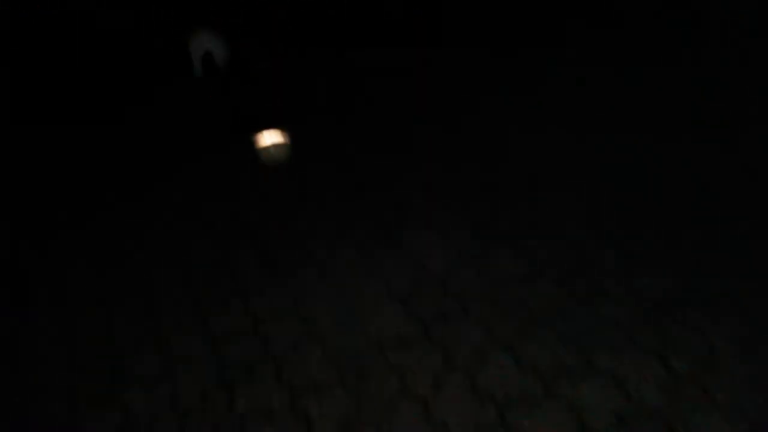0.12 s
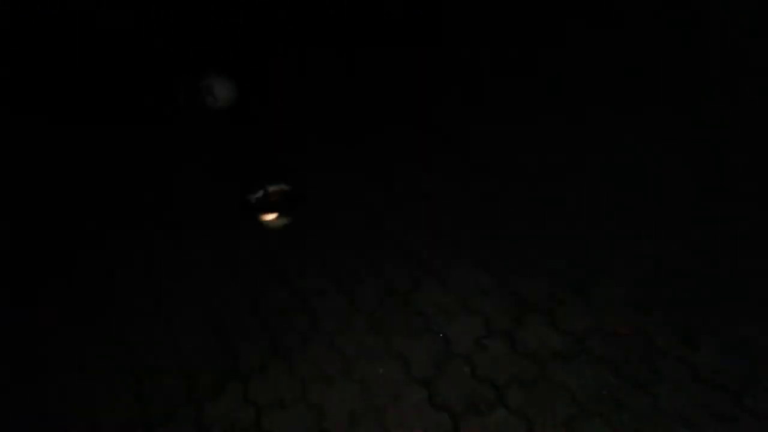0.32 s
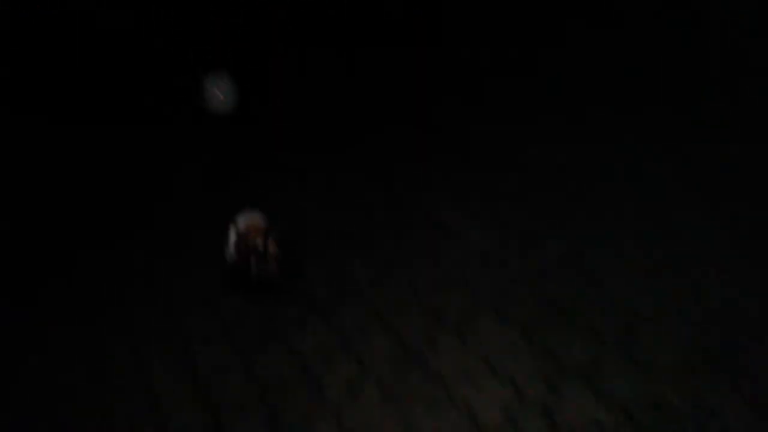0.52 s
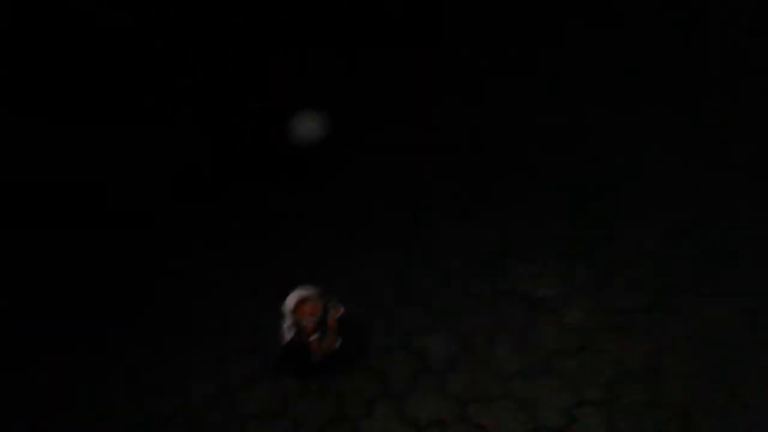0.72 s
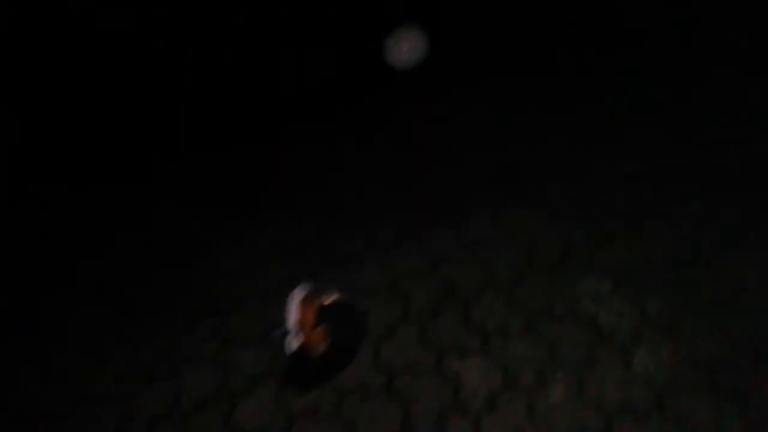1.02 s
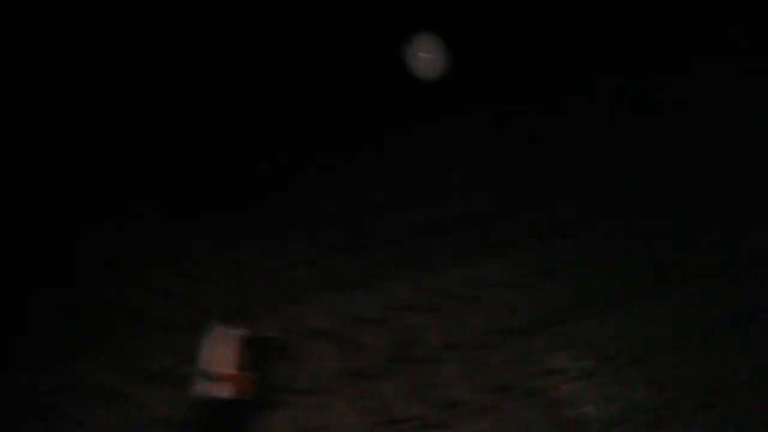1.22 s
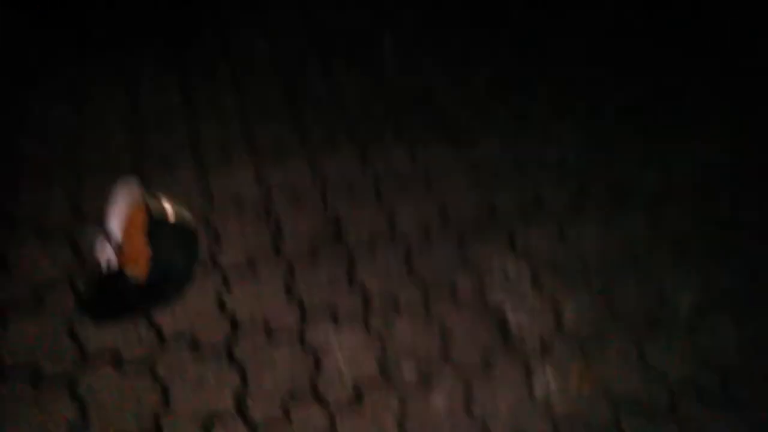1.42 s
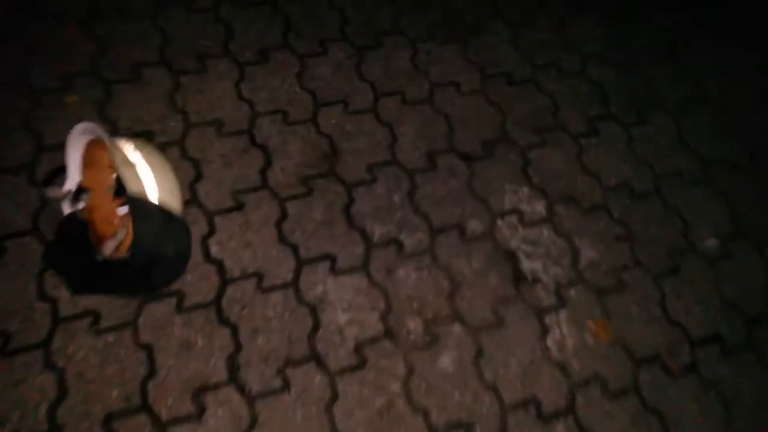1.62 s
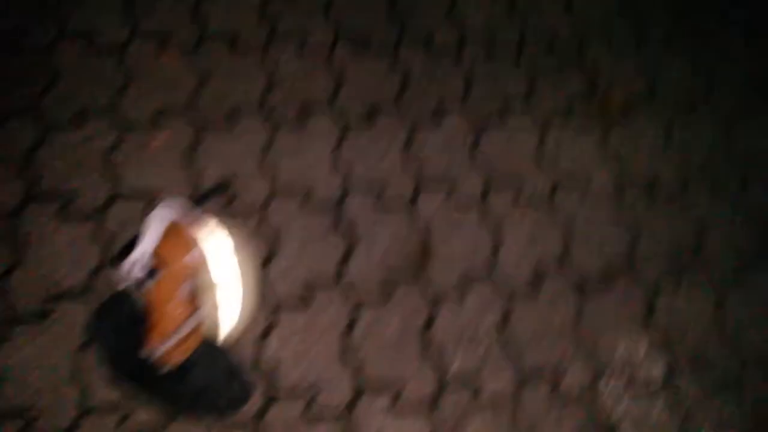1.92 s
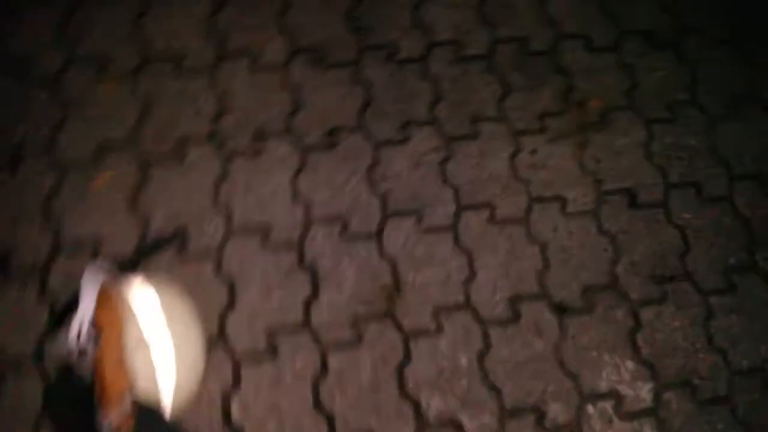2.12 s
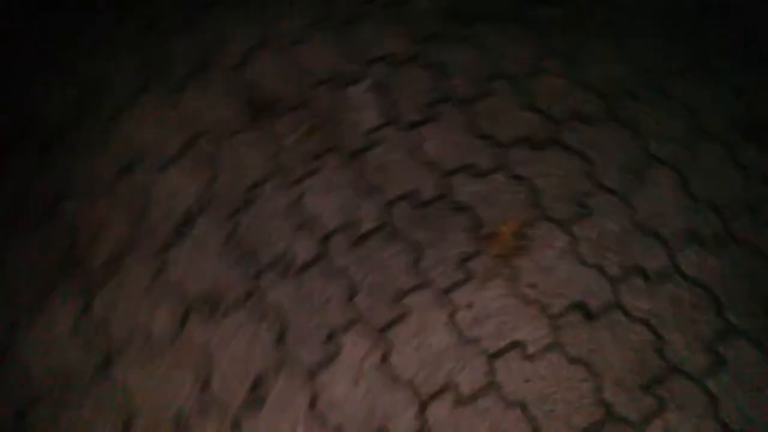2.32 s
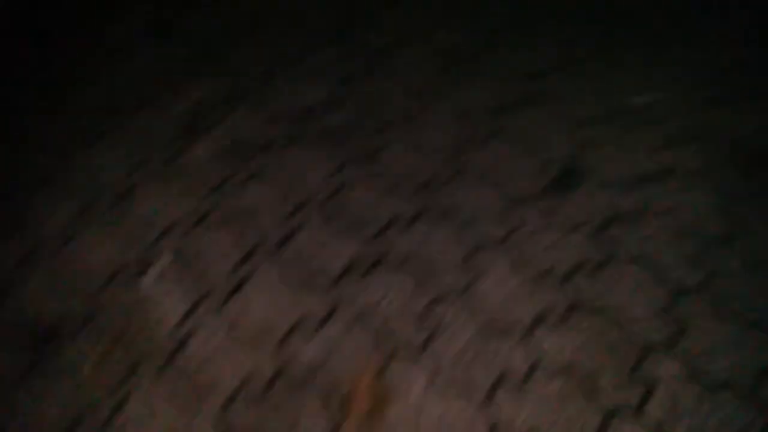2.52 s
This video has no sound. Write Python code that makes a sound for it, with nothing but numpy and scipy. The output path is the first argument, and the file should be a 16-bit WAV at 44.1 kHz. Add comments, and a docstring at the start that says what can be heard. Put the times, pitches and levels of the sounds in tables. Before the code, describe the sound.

Hard-shelled helmet cracks and skitters over outdoor paving, followed by gritty steps and dry knocks

```python
"""Over a thin night rustle a hard helmet clatters away across stone paving, a wall answering each blow.
The walker follows with thuds, knocks, scuffs and ticks of grit and gear. Blows and ticks are noise cracks with a
hollow tock, the helmet adds ringing shell modes; thuds and knocks are short sine hollows with noise; scuffs, rustle,
handling and wind are shaped noise. The two microphone ports differ, and the right one peaks in the treble."""
import sys
import numpy as np
from scipy import signal
from scipy.fft import rfft, irfft, next_fast_len
from scipy.io import wavfile
from scipy.ndimage import uniform_filter1d, map_coordinates

SR = 44100
rng = np.random.default_rng(int(sys.argv[2]) if len(sys.argv) > 2 else 0)


def attenuation_scalar(level_db):
    """Turn a level in dB into a linear amplitude multiplier (20 dB per decade)."""
    decades = np.asarray(level_db, float) / 20
    return 10 ** decades


def store_wav(level_fs):
    """Save 16-bit WAV to argv[1]."""
    pcm = np.round(np.clip(np.atleast_2d(level_fs), -1, 1) * 32767)
    wavfile.write(sys.argv[1], SR, pcm.T.astype(np.int16))


N = 116865


def unit(x):
    """Scales to rms 1."""
    return x / np.sqrt(np.mean(x ** 2) + 1e-20)


def along(points, hz):
    """Reads (Hz, value) points on a log frequency axis."""
    point_hz, value = np.transpose(points)
    return np.interp(np.log(hz + 1), np.log(point_hz + 1), value)


def wobble(knots_per_s):
    """A smooth random curve through up to 400 knots a second."""
    knots = rng.standard_normal(int(N * 400 / SR) + 4)
    return map_coordinates(knots, [np.arange(N) * min(knots_per_s, 400) / SR])


def filtered(x, response):
    """Multiplies the spectrum of x by a response of frequency."""
    size = next_fast_len(x.shape[-1] + 2048)
    spectrum = rfft(x, size) * response(np.fft.rfftfreq(size, 1 / SR))
    return irfft(spectrum, size)[..., :x.shape[-1]]


def noise(colour, size=N):
    """Two unrelated noises, jointly of rms 1: the sound itself and what differs between the ports."""
    return unit(filtered(rng.standard_normal((2, size)), lambda hz: attenuation_scalar(along(colour, hz))))


def add(x, start_s, sound):
    """Lays a sound into x at a time, cut off at the end of x."""
    part = x[:, round(start_s * SR):][:, :sound.shape[1]]
    part += sound[:, :part.shape[1]]


def decay(t, t60_s, rise_s):
    """Quick rise, exponential fall of 60 dB in t60_s (at least 3 ms)."""
    return attenuation_scalar(-60 * t / max(t60_s, 0.003)) * (1 - np.exp(-t / rise_s))


RISE_S = 0.00027  # onset of cracks, knocks and cloth crackle

# Drift of the background beds, relative levels joined by straight lines:
# start_s [s], hiss_db [dB], hand_db [dB], wind_db [dB]
BED_LEVELS = [(0, -55.5, -107, -60), (0.299, -62.5, -51, -64), (.85, -56.5, -61, -60),
              (1.201, -61, -57, -50.5), (1.45, -55, -56, -55.5), (1.75, -53, -57, -47),
              (2.1, -50.5, -50, -60.5), (2.65, -53, -46.5, -45.5)]
# Colour of the night hiss before the right port's response is divided out: pitch_hz [Hz], level_db [dB]
HISS_COLOUR = [(200, -3), (700, -1), (2000, -9), (3500, -5.5), (7900, -9.5), (10800, 4.5), (16000, -13.5)]
# Colour of the handling noise: pitch_hz [Hz], level_db [dB]
HAND_COLOUR = [(90, -5), (170, 0.5), (280, 4.5), (1200, -30)]
# Colour of the wind hum: pitch_hz [Hz], level_db [dB]
WIND_COLOUR = [(25, -11.5), (65, 1.5), (130, -7), (300, -14), (600, -66)]


def rustle():
    """Night hiss bursting into bright and dull cloth crackle, a low wind hum and lumpy knocks of the hand."""
    crackles_per_s, base_db, spread_db = 75, 10, 2.5
    start_s, hiss_db, hand_db, wind_db = np.transpose(BED_LEVELS)
    t = np.arange(N) / SR
    draws = rng.random((int(crackles_per_s * N / SR), 2))
    at = (draws[:, 0] * N).astype(int)
    size = attenuation_scalar(base_db - spread_db * np.log(1 - draws[:, 1]))  # a few stand well above the rest

    def crackle(first, t60_s):
        """Level bursts of every second crackle."""
        hits = np.bincount(at[first::2], size[first::2], N)
        return signal.fftconvolve(hits, decay(t[:SR // 20], t60_s, RISE_S))[:N]

    night = filtered(noise(HISS_COLOUR), lambda hz: attenuation_scalar(-along(RIGHT_PORT, hz)))
    dull = filtered(night, lambda hz: 1 / (1 + (hz / 3000) ** 4))
    bright = night - dull
    hiss = night * attenuation_scalar(3.0 * wobble(12.21)) + bright * crackle(0, 0.0041) + dull * crackle(1, 0.036)
    hand = attenuation_scalar(np.interp(t, start_s, hand_db) + 7.7 * wobble(45.23)) * noise(HAND_COLOUR)
    wind = attenuation_scalar(np.interp(t, start_s, wind_db) + 1.9 * wobble(2.46)) * noise(WIND_COLOUR)
    return attenuation_scalar(np.interp(t, start_s, hiss_db)) * hiss + hand + wind


# Soles and shell dragging over grit:
# start_s [s], length_s [s, fall to 1/e], level_db [relative dB], dull_db [dB at 1500 Hz over 9 kHz]
SCUFFS = [(0.243, 0.043, -40.5, 53), (0.331, 0.025, -39, 17), (0.559, 0.037, -37, -24),
          (0.987, 0.039, -42.5, -25), (1.229, 0.069, -48.5, -3), (1.508, 0.057, -54.5, 14),
          (1.684, 0.27, -57.5, 4), (1.969, 0.2, -56, 7), (2.172, 0.043, -36.5, 41), (2.632, 0.13, -45, 3)]


def scuffs():
    """Grit crunches as coloured noise, in random clumps under each dragging stroke."""
    out = np.zeros((2, N))
    clumps = attenuation_scalar(6 * wobble(200))  # 6 dB deep
    t = np.arange(SR // 6) / SR
    for start_s, length_s, level_db, dull_db in SCUFFS:
        stroke = np.clip(t / 0.0058, 0, 1) * np.exp(-(t / length_s) ** 2)
        colour = [(300, dull_db + 1.5), (1500, dull_db), (5000, dull_db / 2), (9000, 0)]
        add(out, start_s, attenuation_scalar(level_db) * stroke * noise(colour, size=len(t)))
    return out * clumps


def crack(treble_db, presence_db, middle_db, t60_s):
    """A noise snap, its longer rattle and a hollow sine tock, each crack with its own tone balance."""
    trim_db, presence_trim_db, middle_trim_db = -10.5, 6.5, 9
    snap_share, rattle_db = 0.27, -8.5  # snap's share of the t60; rattle under the snap
    tock_hz, tock_t60_s, tock_db = 1600, 0.013, -6  # centre pitch; level over the middle
    t = np.arange(SR // 8) / SR
    middle_db = middle_db + middle_trim_db
    presence_db = presence_db + presence_trim_db
    colour = [(200, middle_db - 90), (1500, middle_db - 4), (2400, presence_db), (4500, presence_db), (9000, 0)]
    snap = decay(t, t60_s * snap_share, RISE_S)
    rattle = attenuation_scalar(rattle_db) * decay(t, t60_s, RISE_S)
    grain = rng.standard_normal((2, len(t)))
    grain = grain / np.sqrt(uniform_filter1d(grain ** 2, size=24))  # evens out the random level
    burst = filtered(grain * (snap + rattle), lambda hz: attenuation_scalar(along(colour, hz)))
    pitch_hz = tock_hz * attenuation_scalar(rng.normal(0, 1.0))  # a random detune per crack
    tock = decay(t, tock_t60_s, 0.00087) * np.sin(2 * np.pi * pitch_hz * t)
    return attenuation_scalar(treble_db + trim_db) * (burst + attenuation_scalar(middle_db + tock_db) * tock)


# Ticks of grit and gear, levels before the trims in crack():
# start_s [s], treble_db [dB], presence_db [dB over treble], middle_db [dB over treble], t60_s [s]
TICKS = [(0.1784, -25, -12, -12.5, 0.02), (0.5708, -15.5, -50, -21, 0.058), (0.828, -31, -5, -4.5, 0.042),
         (0.912, -22, -18.5, -21.5, 0.039), (1.0638, -32.5, 12, 12.5, 0.05), (1.1209, -27, -3.5, -8, 0.022),
         (1.1976, -26, -3.5, -3.5, 0.067), (1.2271, -10.5, 0.5, -46, 0.019),
         (1.3396, -24.5, -22, -11.5, 0.028), (1.5236, -31, 8.5, 0, 0.028), (1.529, -11, -10, -39, 0.012),
         (1.5932, -25.5, -9, -35, 0.014), (1.6956, -20.5, -10, -54, 0.052), (1.718, -32.5, -2.5, -48, 0.16),
         (1.7447, -23.5, -7, -42, 0.053), (1.7626, -19.5, -7, -35, 0.087), (2.0223, -13, -8, -21, 0.021),
         (2.0379, -11.5, -12.5, -8, 0.046), (2.1832, -22, -1, 1.5, 0.057), (2.2254, -8.5, -9, -9, 0.037),
         (2.315, -18.5, 0, -49, 0.027), (2.3805, -8.5, -12.5, -52, 0.034), (2.403, -29.5, -1.5, -13, 0.16),
         (2.5073, -28.5, -11, -59, 0.14)]


def ticks():
    """Cracks of grit and gear near the microphone, most short and sharp, a few drawn out into a scrape."""
    out = np.zeros((2, N))
    for start_s, *tone in TICKS:
        add(out, start_s, crack(*tone))
    return out


# Short dry knocks of shell and pebbles on stone: start_s [s], level_db [relative dB], pitch_hz [Hz]
KNOCKS = [(0.371, -23, 1950), (0.661, -33.5, 1530), (0.694, -33.5, 485), (1.775, -33, 655), (2.0, -29, 970),
          (2.046, -38.5, 660), (2.116, -35.5, 1790), (2.137, -48, 820), (2.175, -24, 1010),
          (2.189, -24, 1280), (2.2709, -25, 1790), (2.279, -24.5, 1330), (2.3285, -20.5, 626),
          (2.4229, -42, 585), (2.446, -34.5, 2280), (2.4705, -39, 1470)]


def knocks():
    """A small hollow rings for a few cycles, roughened by grit noise in a wide band around its pitch."""
    cycles, grit_db = 12, -5  # cycles until 60 dB down; grit under the tone
    out, t = np.zeros((2, N)), np.arange(SR // 20) / SR
    for start_s, level_db, pitch_hz in KNOCKS:
        grit = noise([(pitch_hz / 4, -20), (pitch_hz, 0), (pitch_hz * 4, -14)], size=len(t))
        body = np.sin(2 * np.pi * pitch_hz * t) + attenuation_scalar(grit_db) * grit
        add(out, start_s, attenuation_scalar(level_db) * decay(t, cycles / pitch_hz, RISE_S) * body)
    return out


# Hollow thuds of shell and soles: start_s [s], level_db [relative dB], pitch_hz [Hz at the onset]
THUDS = [(0.236, -25.5, 151), (0.368, -14.5, 520), (0.398, -21.5, 284), (0.503, -33.5, 328),
         (0.743, -33.5, 246), (0.993, -34, 154), (1.064, -22.5, 493), (1.225, -30, 290), (1.525, -29, 342),
         (1.797, -32, 241), (1.927, -24, 272), (2.314, -25.5, 284), (2.328, -25.5, 185)]


def thuds():
    """A hollow rings briefly as its pitch sags, with one jolt pulse and a broad dull puff of noise."""
    puff_db, jolt_db, jolt_s = -11, -3, 0.000308  # levels over the hollow; width of the jolt
    out, t = np.zeros((2, N)), np.arange(SR // 8) / SR
    bell = (t / jolt_s - 3) ** 2
    jolt = (2 * bell - 1) * np.exp(-bell)
    for start_s, level_db, pitch_hz in THUDS:
        puff_colour = [(pitch_hz / 4, -24), (pitch_hz, 0), (pitch_hz * 5, -30)]
        puff = noise(puff_colour, size=len(t)) * decay(t, 0.077, 0.00024)
        hollow = np.sin(2 * np.pi * pitch_hz * t * (1 - 1.07 * t)) * decay(t, 0.045, 0.0034)
        add(out, start_s, attenuation_scalar(level_db) * (hollow + attenuation_scalar(puff_db) * puff + attenuation_scalar(jolt_db) * jolt))
    return out


# Ringing modes of the helmet shell: pitch_hz [Hz], level_db [relative dB], t60_s [s]
SHELL_MODES = [(1476, -17, 0.085), (2683, -11, 0.12), (5300, 8, 0.014)]


def shell_ring():
    """The shell's modes ring as decaying sines, their balance a little different at each blow."""
    t = np.arange(SR // 8) / SR
    ring = np.zeros(len(t))
    for pitch_hz, level_db, t60_s in SHELL_MODES:
        level = attenuation_scalar(level_db + rng.normal(0, 0.53))
        ring += level * decay(t, t60_s, 0.0025) * np.sin(2 * np.pi * pitch_hz * t)
    return ring


def wall_and_yard(cracks):
    """A wall returns the cracks late and smeared, the yard trails after: convolution with fading noise."""
    t = np.arange(SR // 3) / SR

    def tail(level_db, t60_s, rise_s):
        """A fade with its total energy set by level_db."""
        return attenuation_scalar(level_db) * unit(decay(t, t60_s, rise_s)) / np.sqrt(len(t))

    wall = np.roll(tail(-10, 0.051, 0.00071), round(0.024 * SR))  # 24 ms late
    yard = tail(-17.5, 1, 0.03)
    answer = rng.standard_normal((2, len(t))) * (wall + yard)
    return signal.fftconvolve(cracks[:1], answer, axes=1)[:, :N]


# Blows of the helmet on stone, levels before the trims in crack(): start_s [s], treble_db [dB],
# presence_db [dB over treble], middle_db [dB over treble], ring_db [dB over treble_db]
CLACKS = [(0.0915, -35.5, 2.5, 11.5, -28), (0.238, -12.5, -7.5, -18.5, -38), (0.3113, -2, -3, 1.5, -24),
          (0.4, -24, 13, 4.5, -24), (0.5013, -11.5, -6.5, -62, -23), (0.606, -4, -14.5, -18, -10.5),
          (0.6891, -23, -5, -4.5, -9.5)]


def helmet():
    """Each blow cracks on the stone and rings the shell unsteadily; wall and yard answer the cracks."""
    cracks, rings = np.zeros((2, N)), np.zeros((1, N))
    for start_s, treble_db, presence_db, middle_db, ring_db in CLACKS:
        add(cracks, start_s, crack(treble_db, presence_db, middle_db, 0.031))
        add(rings, start_s, attenuation_scalar(treble_db + ring_db) * shell_ring()[None])
    return cracks + rings * attenuation_scalar(3 * wobble(120)) + wall_and_yard(cracks)


# Likeness of the sound at the two ports: pitch_hz [Hz], likeness [0 to 1]
LIKENESS = [(40, 0.25), (200, 1), (2000, 0.18), (6000, 0.073)]


def scene():
    """Sums all sources; the left port shares part of the right port's sound, by frequency."""
    same, other = helmet() + ticks() + thuds() + knocks() + scuffs() + rustle()

    def alike(hz):
        return np.clip(along(LIKENESS, hz), 0, 1)

    left = filtered(same, alike) + filtered(other, lambda hz: np.sqrt(1 - alike(hz) ** 2))
    return np.array([left, same])


# Response of the right port, peaking in the treble: pitch_hz [Hz], level_db [dB]
RIGHT_PORT = [(50, -9), (7500, 3), (9000, 5.5), (11000, 13), (13000, 3), (15500, -13.5)]
# Left port compared with the right: pitch_hz [Hz], level_db [dB over right]
LEFT_OVER_RIGHT = [(40, -1.5), (100, -1.5), (500, -5.5), (2000, -4), (7000, -3), (9000, -25), (15000, -31)]
# Phase by which the left port leads: pitch_hz [Hz], lead_rad [radians]
LEFT_LEAD = [(0, 0.5), (1120, 1), (4910, -7.5), (8870, -26.5), (14200, 8)]


def microphone_ports(dry):
    """Each port colours the sound; the left one also shifts its phase."""
    lead_hz, lead_rad = np.transpose(LEFT_LEAD)

    def response(hz):
        left = attenuation_scalar(along(LEFT_OVER_RIGHT, hz)) * np.exp(1j * np.interp(hz, lead_hz, lead_rad))
        return attenuation_scalar(along(RIGHT_PORT, hz)) * np.array([left, np.ones_like(hz)])

    return filtered(dry, response)


def roll_off(x):
    """The treble ends steeply here."""
    return signal.sosfilt(signal.butter(12, 16510, fs=SR, output="sos"), x)


def record(dry):
    """The two ports pick up the scene; after 4.5 dB of gain, peaks over full scale clip."""
    mix = np.clip(attenuation_scalar(4.5) * microphone_ports(dry), -1, 1)
    return roll_off(mix)


dry = scene()
out = record(dry)
store_wav(out)
```